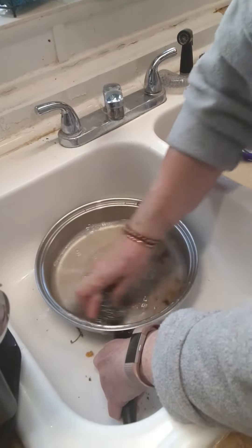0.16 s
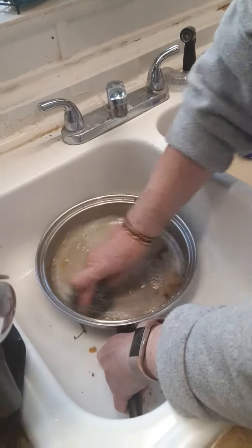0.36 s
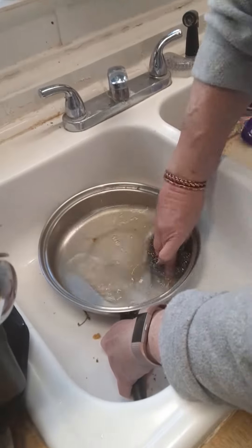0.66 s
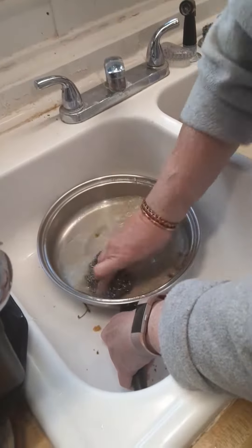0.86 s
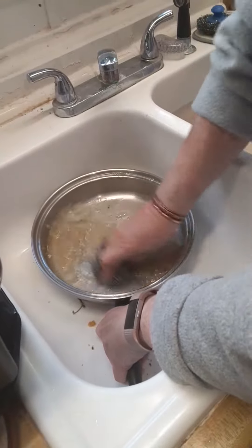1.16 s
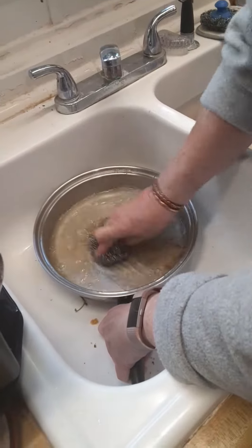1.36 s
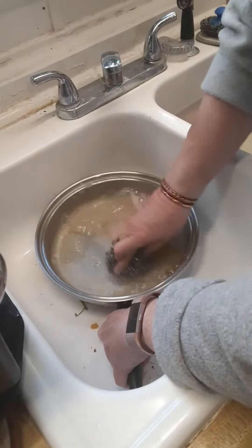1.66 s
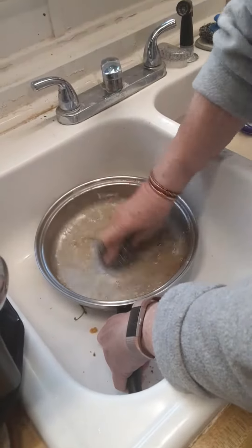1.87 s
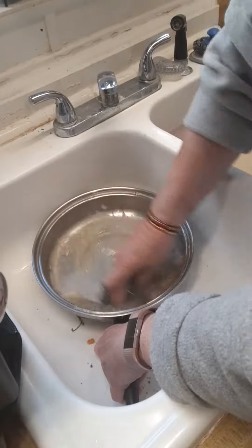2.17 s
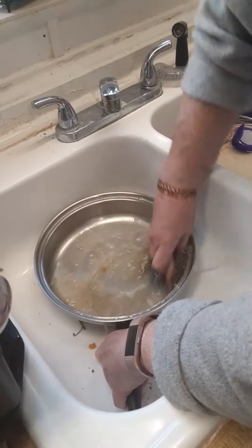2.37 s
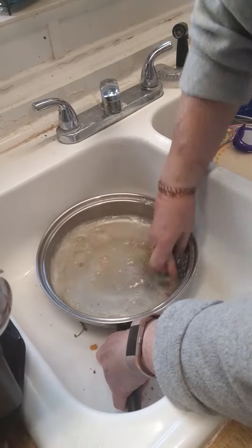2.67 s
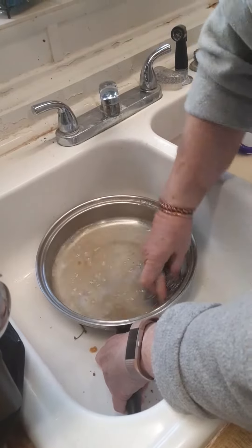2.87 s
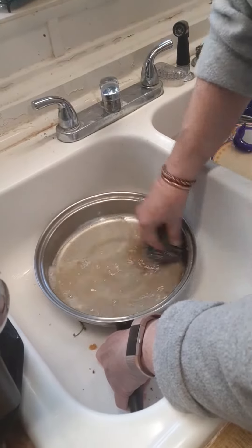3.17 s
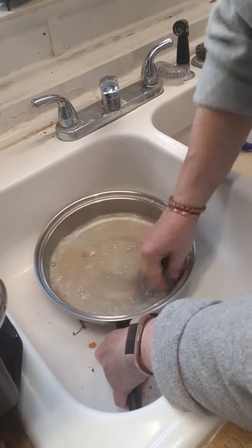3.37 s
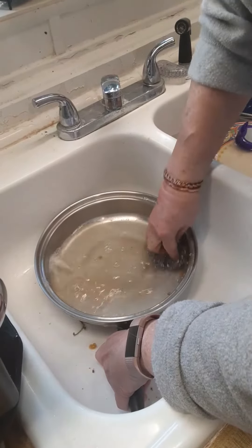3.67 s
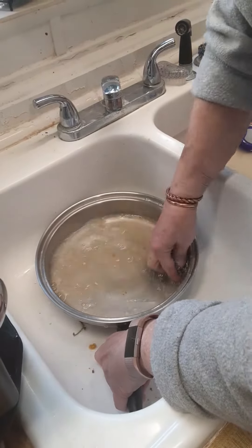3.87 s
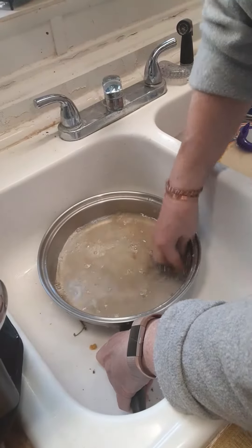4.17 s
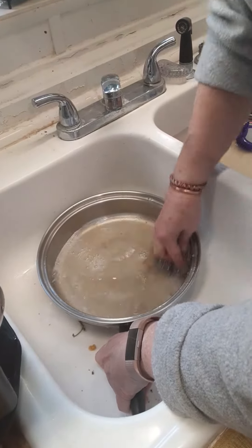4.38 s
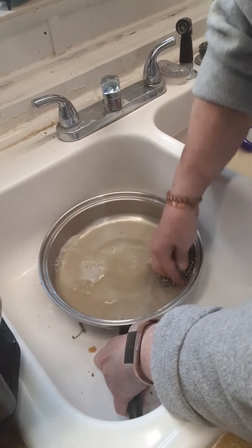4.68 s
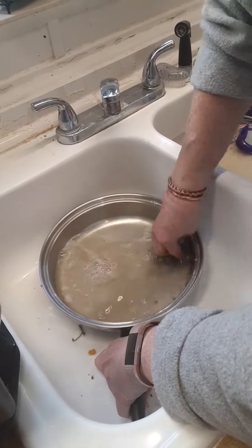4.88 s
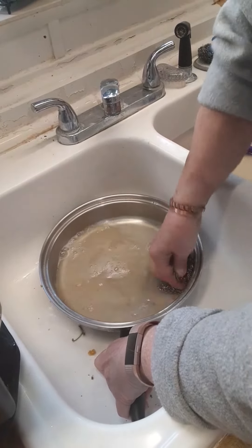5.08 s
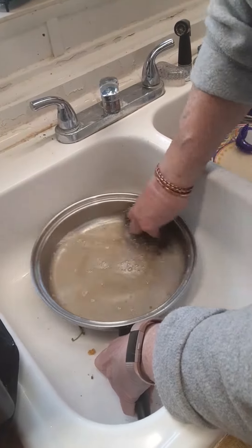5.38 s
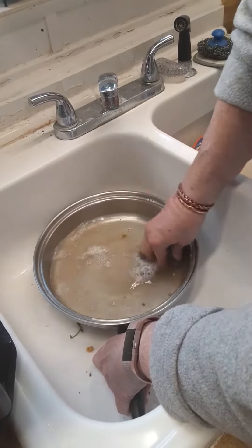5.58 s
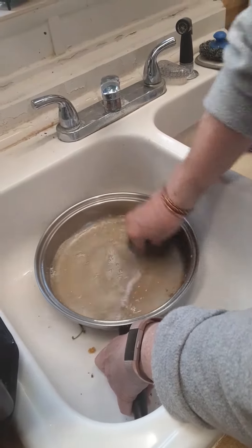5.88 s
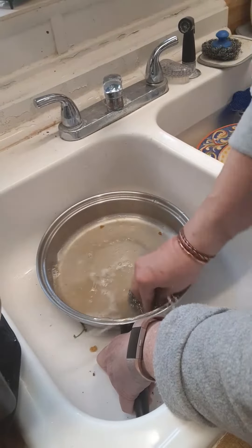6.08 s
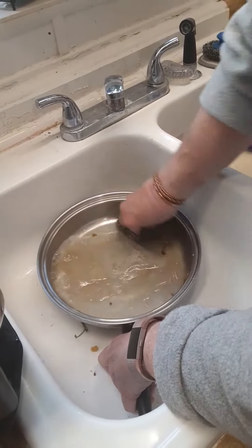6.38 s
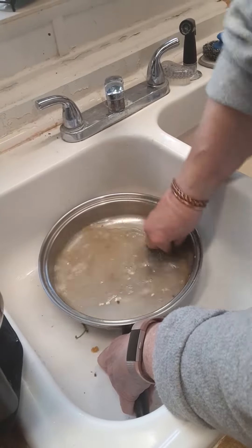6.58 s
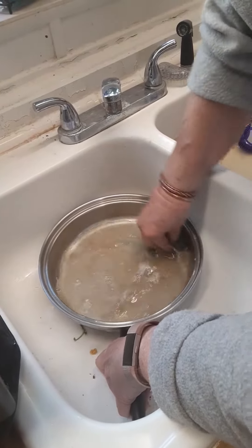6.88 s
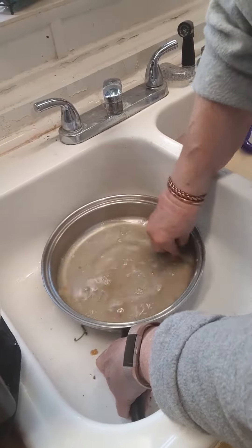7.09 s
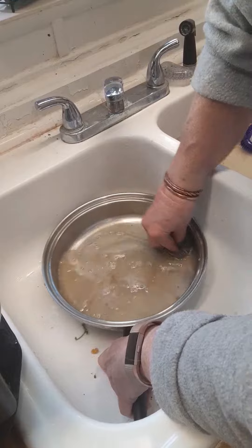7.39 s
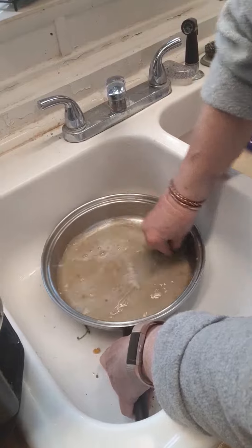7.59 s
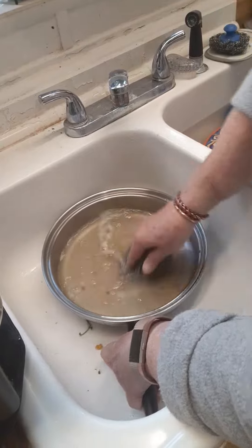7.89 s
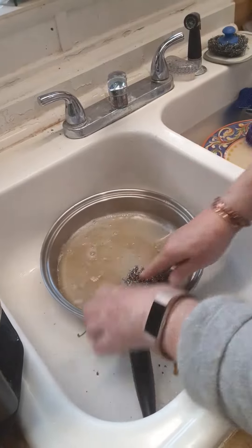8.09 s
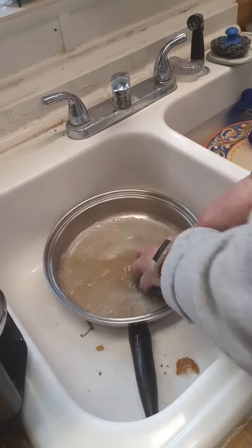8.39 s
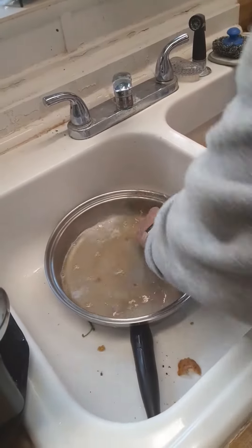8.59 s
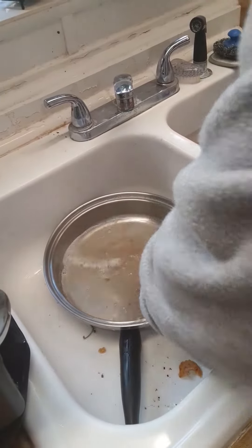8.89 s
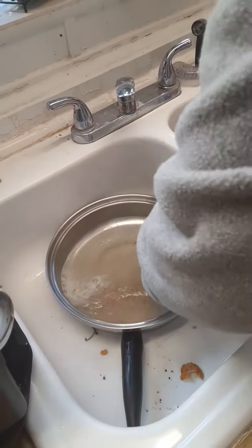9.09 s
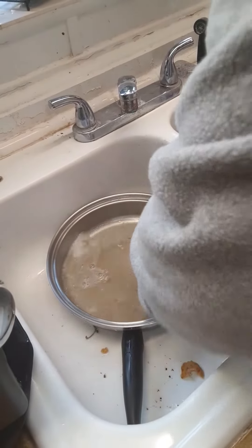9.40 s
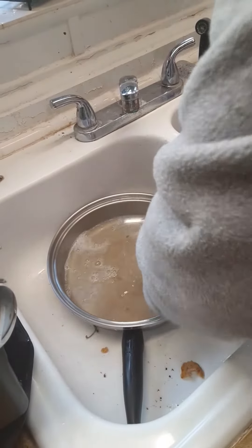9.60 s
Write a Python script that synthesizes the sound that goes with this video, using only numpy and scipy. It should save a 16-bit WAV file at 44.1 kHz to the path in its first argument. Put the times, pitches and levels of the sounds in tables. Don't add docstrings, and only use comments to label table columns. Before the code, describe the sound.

Gritty wet scrubbing strokes hiss over a metal pan while water sloshes, bubbles pop and the pan clanks hard on the basin.

```python
import sys
import numpy as np
from scipy import signal
from scipy.fft import rfft, irfft, next_fast_len
from scipy.io import wavfile
from scipy.ndimage import uniform_filter1d, map_coordinates

SR = 44100
rng = np.random.default_rng(int(sys.argv[2]) if len(sys.argv) > 2 else 0)


def wav_out(sig):
    wavfile.write(sys.argv[1], SR, np.round(np.clip(np.atleast_2d(sig).T, -1, 1) * 32767).astype(np.int16))


def convert_level_to_amplitude(level_db):
    exponent = np.asarray(level_db, float) / 20
    return 10 ** exponent


N = 429093


def unit(x):
    return x / np.sqrt(np.mean(x ** 2) + 1e-20)


def along(points, hz):
    f, v = np.transpose(points)
    return np.interp(np.log(hz + 1), np.log(f + 1), v)


def wobble(rate_hz):
    knots = rng.standard_normal(int(N * rate_hz / SR) + 4)
    return map_coordinates(knots, [np.arange(N) * rate_hz / SR])


def filtered(x, response):
    m = next_fast_len(N + SR // 2)
    return irfft(rfft(x, m) * response(np.fft.rfftfreq(m, 1 / SR)), m)[..., :N]


def resonances(modes):
    def response(f):
        total = 0
        for k, (hz, width, db) in enumerate(modes):
            total = total + (-1) ** k * convert_level_to_amplitude(db) * 1j * f * width / (hz * hz - f * f + 1j * f * width)
        return total
    return response


def ports(f):
    lag = np.array([[0], [7]]) / SR
    return convert_level_to_amplitude([[.75], [-.75]]) * np.exp(-2j * np.pi * f * lag)


# pitch_hz, density_db (per Hz)
QUIET_AIR = [(30, -3.5), (187, -11.5), (468, -7.5), (760, -8.5), (1000, -27.5), (3000, -22), (5000, -22.5),
             (15600, -29.5)]


def kitchen():
    air = unit(filtered(rng.standard_normal((2, N)), lambda f: convert_level_to_amplitude(along(QUIET_AIR, f))))
    hum_hz, hum_db = 737, -67
    hum_level = convert_level_to_amplitude(hum_db + 2.2 * wobble(5.2))
    hum = hum_level * np.sin(2 * np.pi * hum_hz * np.arange(N) / SR + .6 * wobble(7.8))
    return convert_level_to_amplitude(-62.5) * air + hum


# pitch_hz, t60_s
ECHO_DECAY = [(100, 0.27), (500, 0.2), (2000, 0.068), (8000, 0.014), (16000, 0.053)]
# pitch_hz, level_db
ECHO_LEVEL = [(100, -32), (250, -36.5), (500, -10.5), (1000, -9), (2000, 3), (6000, 3.5), (15000, 4.5)]


def echoes(x, count=3):
    hz, t, z = signal.stft(rng.standard_normal((count, 2, SR // 5)), SR, nperseg=256)
    z = z * convert_level_to_amplitude(-60 * t / along(ECHO_DECAY, hz)[:, None])
    strength = np.sqrt(np.mean(np.sum(np.abs(z) ** 2, axis=3), axis=(0, 1)))
    z = z / strength[:, None] * convert_level_to_amplitude(along(ECHO_LEVEL, hz))[:, None]
    tail = signal.istft(z, SR, nperseg=256)[1] / 148
    turn = (np.arange(N) // 4000) % count
    lanes = x * (turn == np.arange(count)[:, None])
    return signal.oaconvolve(np.float32(lanes[:, None]), np.float32(tail), axes=2).sum(axis=0)[:, :N]


# start_s, peak_db
LEANS = [(0.18, -39), (1.61, -49), (2.2, -56.5), (3.02, -50), (3.8, -47), (4.14, -45), (4.5, -50),
         (4.75, -57), (5.27, -39), (5.65, -41), (5.95, -49.5), (6.87, -43.5), (7.45, -40), (7.63, -55),
         (8.73, -49)]


def leans():
    out, t = np.zeros(N + SR), np.arange(SR // 4) / SR
    counter_hz, sink_hz, t60_s, rise_s = 58, 90, 0.2, 0.02
    sway = np.sin(2 * np.pi * counter_hz * t) + 0.8 * np.sin(2 * np.pi * sink_hz * t)
    thump = convert_level_to_amplitude(-60 * t / t60_s) * (1 - np.exp(-t / rise_s)) * sway
    for s, db in LEANS:
        out[round(s * SR):][:len(t)] += convert_level_to_amplitude(db + 9) * thump
    return out[:N]


# start_s, peak_db, clang_db, boom_db, favoured_pitch_hz
BANGS = [(0.175, -6, -13, -14.5, 341), (0.204, -15, -22, -11, 432), (2.397, -16, -27, -10, 264),
         (3.001, -23, -34, -10, 280), (3.05, -42.5, -35, 6, 215), (3.588, -20.5, -19, -34, 283),
         (3.609, -23, 2, -8, 529), (3.76, -20, -28.5, -14, 340), (4.112, -18.5, -16, -18.5, 326),
         (5.164, -20, -15.5, -28, 572), (5.258, -0.5, -17.5, -14.5, 346), (5.394, -0.5, 1, -21.5, 608),
         (5.631, -17, -26, -23.5, 280), (5.658, -20.5, -18.5, -2, 240), (5.678, -27.5, -37, 3, 249),
         (3.509, -36, -35, 3, 215), (3.912, -40.5, -38, 4.5, 215), (4.502, -35.5, -31, -3, 283),
         (4.431, -40, -34, -0.5, 215), (5.79, -9, -12.5, -33, 1056), (6.212, -14, -22, -11, 283),
         (6.758, -21.5, -23, -15.5, 308), (6.862, -2.5, -17, -18, 305), (6.993, -8, -18.5, -17.5, 380),
         (7.105, -1.5, -20, -10.5, 302), (7.207, -1.5, -9.5, -24.5, 668), (7.362, -2.5, -21.5, -17, 309),
         (7.442, -9.5, -5, -19, 603), (1.603, -30.5, -46, -10.5, 250), (8.723, -29.5, -34, -7.5, 300),
         (5.285, -10, -17.5, -13, 520), (6.874, -16.5, -10, -28.5, 660), (7.135, -12.5, -24.5, -13.5, 330),
         (8.73, -26, -25, -9.5, 240)]
# start_s, peak_db, favoured_pitch_hz
TAPS = [(0.4, -32.5, 330), (0.507, -33, 1120), (0.75, -36, 630), (0.777, -36, 1080), (1.25, -39, 1060),
        (8.452, -28.5, 603), (2.112, -34, 1060), (2.262, -33.5, 283), (3.108, -30.5, 600),
        (3.962, -29.5, 567), (4.311, -32.5, 600), (4.414, -33.5, 324), (4.53, -36, 950),
        (4.693, -29.5, 590), (5.925, -29.5, 480), (6.434, -32.5, 525), (6.57, -37, 292),
        (6.667, -35.5, 290.6), (7.628, -33.5, 283), (8.255, -41, 280), (8.509, -28.5, 600),
        (8.582, -33, 675), (9.1, -35, 910), (9.52, -30, 253), (1.743, -37, 727), (1.787, -38, 1060),
        (2.631, -36, 217), (6.405, -45, 250), (6.839, -34, 310), (7.645, -40, 283), (7.903, -40.5, 780),
        (9.325, -34, 230), (9.495, -40, 1050), (9.703, -35.5, 212), (0.038, -47, 283)]
# pitch_hz, clang_db, edge_db, boom_db
TAP_COLOUR = [
    (280, -51.5, -17.5, -9),
    (600, -4, -10.5, -24.5),
    (1080, 0, -4.5, -17),
]


def blows():
    hz, *colour = np.transpose(TAP_COLOUR)
    taps = [(s, db, *[np.interp(f, hz, c) for c in colour], f) for s, db, f in TAPS]
    bang_edge_db = -25
    bangs = [(s, db, clang, bang_edge_db, boom, f) for s, db, clang, boom, f in BANGS]
    return sorted(taps + bangs)


def after_blows(under_db, rise_s, t60_s):
    t, power = np.arange(SR // 4) / SR, np.zeros(N + SR)
    for s, blow_db, *_ in blows():
        jump = convert_level_to_amplitude(blow_db + under_db - 60 * t / t60_s) * np.minimum(t / rise_s, 1)
        power[round(s * SR):][:len(t)] += jump ** 2
    return np.sqrt(power[:N])


BOOM_HZ, BOOM_SWELL_S = 179.7, 0.035


def thuds():
    out, t = np.zeros(N + SR), np.arange(SR // 3) / SR
    delay_s, width_s, push_db = 0.0047, 0.00042, -3.4
    linger_db, linger_t60_s = -16, 0.66
    push = (t - delay_s) / width_s
    pulse = (push ** 2 - 1) * np.exp(-push ** 2 / 2)
    drum = np.minimum(t / BOOM_SWELL_S, 1) * np.sin(2 * np.pi * BOOM_HZ * t)
    for s, db, clang_db, _, boom_db, _ in blows():
        thud = convert_level_to_amplitude(push_db - .5 * max(clang_db + 30.5, 0)) * pulse
        ring = convert_level_to_amplitude(boom_db + 5.5 + linger_db - 60 * t / linger_t60_s) * drum
        out[round(s * SR):][:len(t)] += convert_level_to_amplitude(db) * (thud + ring)
    return filtered(out[:N], lambda f: (1j * f / (110 + 1j * f)) ** 2)


# pitch_hz, level_db, t60_s
PAN = [(108, -26, 0.5), (209, -2.5, 0.056), (283, 0, 0.087), (332.6, -4.5, 0.058), (432, -3, 0.077),
       (525, -2, 0.096), (588.4, -1, 0.075), (626.8, -3, 0.17), (678, -8.5, 0.11), (874.5, -5.5, 0.071),
       (957, -8, 0.08), (1056, -0.5, 0.076), (1124, -10, 0.044), (1361, -9, 0.1), (1531, -17, 0.09),
       (1530, -5.5, 0.031), (1920, -12, 0.047), (2110, -13.5, 0.043), (2740, -13.5, 0.057)]
# pitch_hz, level_db, t60_s
CLANK = [(150, -19.5, 0.48), (470, -8.5, 0.25), (1060, -4.5, 0.061), (2310, 3.5, 0.0052),
         (6300, -14, 0.025)]


def pan_ring(t, light, clang_db, edge_db, favoured_hz):
    f, clank_db, clank_t60 = np.transpose(CLANK)
    crowd = 200 * 28 ** ((np.arange(48) + rng.random(48)) / 48)
    crowd_modes = [crowd, np.interp(crowd, f, clank_db) - 3.5, np.interp(crowd, f, clank_t60)]
    hz, level, t60 = np.hstack([np.transpose(PAN), crowd_modes])[:, :, None]
    tilt = np.interp(np.log(hz), np.log([450, 1000, 2600]), [0, clang_db + 12.5, edge_db + 19.5])
    spot = (10 + 7 * light) * np.exp(-(np.log(hz / favoured_hz) / 0.07) ** 2)
    size = convert_level_to_amplitude(level + tilt + spot + rng.normal(0, 1.5, hz.shape))
    onset = 0.000943 + 0.00308 * rng.random(hz.shape) * (400 / hz) ** 0.285
    size, onset, turn, loss = np.float32([size, onset, 2 * np.pi * hz, np.log(1000) / t60])
    age = np.maximum(t - onset, 0)
    return (size * np.exp(-loss * age) * np.sin(turn * age)).sum(axis=0)


def crack(t, edge_db):
    grit = np.convolve(rng.standard_normal(len(t)), np.hanning(6), "same")
    return convert_level_to_amplitude(min(edge_db, -14) + 11.5 - 60 * t / 0.0065) * np.minimum(t / 0.00067, 1) * grit


def basin_boom(t, boom_db, flutter):
    swell = t / BOOM_SWELL_S
    shape = swell * np.exp(-swell ** 2.27 / 2) * (1 + 0.2 * flutter)
    return convert_level_to_amplitude(boom_db + 5.0) * shape * np.sin(2 * np.pi * BOOM_HZ * (1 + 0.02 * flutter[0]) * t)


def knocks():
    out, full = np.zeros(N + SR), np.arange(SR // 7, dtype=np.float32) / SR
    flutter_depth, flutter_grain_s, ring_share, quick_loss_s = 0.2, 0.004, 0.45, 0.018
    landing_s = 0.0047
    for s, db, clang_db, edge_db, boom_db, favoured_hz in blows():
        light = db < -26
        t = full[:SR // 11] if light else full
        ring = pan_ring(t, light, clang_db, edge_db, favoured_hz)
        flutter = np.interp(t, np.arange(40) * flutter_grain_s, rng.standard_normal(40))
        ring = ring * (1 + flutter_depth * flutter * np.minimum(t / .01, 1))
        ring = ring * (ring_share + (1 - ring_share) * np.exp(-t / quick_loss_s))
        blow = ring / np.abs(ring).max() + crack(t, edge_db) + basin_boom(t, boom_db, flutter)
        fade = np.minimum(1, (t[-1] - t) / 0.042) * np.minimum(1, t / landing_s)
        out[round(s * SR):][:len(t)] += convert_level_to_amplitude(db + 2.5) * fade * blow
    return filtered(out[:N], lambda f: (1j * f / (125 + 1j * f)) ** 3)


def bubble(hz, cycles, rise, t):
    age = t * hz / cycles
    return np.sin(2 * np.pi * hz * t * (1 + rise * age / 2)) * np.exp(-age) * (1 - np.exp(-t * hz / 0.66))


# start_s, peak_db, pitch_hz, spray_db
POPS = [(0.0597, -33.5, 1970, 7.5), (0.3397, -28, 2310, 10), (0.506, -28.5, 1890, -22.5),
        (0.6177, -36, 1920, -9), (0.7413, -29.5, 3060, 9.5), (0.8014, -27, 2010, -4.5),
        (1.087, -23, 1920, -4.5), (1.1325, -22.5, 1770, 7), (1.4825, -28, 2000, -22),
        (1.5191, -29, 2110, 10), (1.84, -27.5, 1530, -12.5), (1.872, -29.5, 2060, 7.5),
        (1.8984, -27.5, 3560, 4), (1.9779, -33, 2740, 7), (2.0113, -28.5, 1310, -7),
        (2.103, -18.5, 4770, 2.5), (2.124, -25, 2250, 3.5), (2.1378, -26, 1750, -15),
        (2.278, -22, 4760, -5.5), (2.3183, -13.5, 2910, -1), (2.3267, -15, 4400, -6.5),
        (1.131, -28, 1250, -10), (1.497, -36.5, 1230, -9), (1.958, -39, 1220, -10), (2.186, -31, 2150, -7),
        (3.379, -41, 4630, 17.5), (3.39, -24.5, 2060, -4.5), (3.502, -26, 1820, 7),
             (4.3488, -32, 2120, 3.5), (5.1198, -17.5, 4500, -14.5), (5.303, -20, 2050, -32),
             (5.3381, -28, 2110, -23.5), (5.7704, -26, 2010, -5), (5.978, -30, 3600, 1),
             (6.5756, -34, 1590, -4), (7.8424, -34, 3130, 9.5), (7.9108, -30.5, 4650, 10.5),
             (7.949, -40.5, 1494, -6), (8.09, -57.5, 2020, 19), (8.1347, -51.5, 2950, 13),
             (8.4509, -26.5, 2530, 2.5), (8.5133, -27.5, 1920, -28.5)]


def pops():
    out, t = np.zeros(N + SR), np.arange(SR // 14) / SR
    for s, db, hz, spray_db in POPS:
        pitch, late = rng.standard_normal((7, 1)), rng.random((7, 1))
        small_hz = hz * np.exp(0.28 + .45 * pitch)
        small = bubble(small_hz, 1.1, 0.056, np.maximum(t - 0.0098 * late, 0)).sum(axis=0)
        spray = convert_level_to_amplitude(-60 * t / 0.0048) * rng.standard_normal(len(t))
        splash = convert_level_to_amplitude(spray_db - 13.0) * (small + convert_level_to_amplitude(1.5) * spray)
        out[round(s * SR):][:len(t)] += convert_level_to_amplitude(db + 2.5) * (bubble(hz, 3.7, 0.009, t) + splash)
    return out[:N]


# start_s, peak_db, t60_s
SKIDS = [
    (0.742, -32.5, 0.03),
    (1.131, -31.5, 0.03),
    (1.519, -31.5, 0.03),
    (2.1, -29.5, 0.05),
    (2.317, -10.5, 0.022),
    (2.325, -24.5, 0.035),
    (7.646, -32, 0.03),
    (7.907, -35.5, 0.04),
    (8.451, -23, 0.025),
    (8.51, -35.5, 0.02),
]


def skids():
    out, t = np.zeros(N + SR), np.arange(SR // 14) / SR
    band = signal.butter(2, (1600, 5500), "band", fs=SR)
    rise_s = 0.0015
    for s, db, t60 in SKIDS:
        grit = signal.lfilter(*band, rng.standard_normal(len(t)))
        out[round(s * SR):][:len(t)] += convert_level_to_amplitude(db - 2 - 60 * t / t60) * np.minimum(t / rise_s, 1) * grit
    return out[:N]


# start_s, peak_db, pitch_hz
SNAGS = [(0.3283, -27.5, 14100), (0.8777, -21.5, 15000), (0.8976, -22.5, 12700), (1.1454, -16, 14500),
         (1.4989, -26.5, 15100), (1.5214, -21, 11800), (2.0208, -23, 12750), (2.1008, -18, 7840),
         (2.157, -31, 11300), (2.1715, -24, 14800), (2.215, -24.5, 12170), (2.3163, -27, 12300),
         (3.3767, -22.5, 12500), (4.155, -23, 9090), (5.5069, -16.5, 9930), (5.642, -29.5, 15100),
         (5.676, -17, 14400), (5.8571, -22, 14500), (6.406, -31.5, 11500), (7.648, -17, 14000),
         (8.4523, -24, 13500), (8.7266, -26.5, 7800), (8.9018, -18, 7770), (8.964, -16.5, 14900),
         (9.101, -15.5, 14000), (9.32, -27.5, 11700), (9.4923, -28, 15200)]


def snags():
    out, t = np.zeros(N + SR), np.arange(SR // 50) / SR
    t60_s, width_hz, broad_db = 0.006, 2500, -4
    for s, db, hz in SNAGS:
        a, b = rng.standard_normal((2, len(t)))
        tone = np.sin(2 * np.pi * hz * t)
        near = unit(np.convolve(a, np.exp(-np.pi * width_hz * t[:40]), "same")) * tone
        shape = convert_level_to_amplitude(db + 2.5 - 60 * t / t60_s) * np.minimum(t / .0004, 1)
        out[round(s * SR):][:len(t)] += shape * (tone + 0.37 * near + convert_level_to_amplitude(broad_db) * b)
    return filtered(out[:N], lambda f: (1j * f / (4000 + 1j * f)) ** 2)


# pitch_hz, level_db
SCATTER = [(100, -33), (200, -18.5), (500, -25.5), (2000, 15.5), (3300, 4), (5000, 15.5), (15000, 41.5)]


def scratches(colour, spread_db, patchy_db):
    sizes = convert_level_to_amplitude(spread_db * np.minimum(rng.exponential(size=N), 5.5))
    x = rng.standard_normal((3, N)) * sizes
    z = signal.stft(x.astype(np.float32), nperseg=256)[2]
    field = uniform_filter1d(uniform_filter1d(rng.standard_normal(z.shape[1:]), 6, 0), 8, 1)
    x = signal.istft(z * convert_level_to_amplitude(patchy_db * unit(field)).astype(np.float32), nperseg=256)[1]
    m = next_fast_len(N + SR // 2)
    f, spectrum = np.fft.rfftfreq(m, 1 / SR), rfft(x, m)
    stray = convert_level_to_amplitude(along(SCATTER, f))
    both = (spectrum[0] * ports(f) + spectrum[1:] * stray) / np.sqrt(1 + stray ** 2)
    return unit(irfft(both * colour(f), m)[:, :N])


def pan_drag():
    shell = [(55, 40, -17), (BOOM_HZ, 12, 7)]
    shell += [(hz, 1.2 / t60, db) for hz, db, t60 in PAN]
    return convert_level_to_amplitude(1.3 * wobble(22)) * scratches(resonances(shell), spread_db=1.16, patchy_db=3)


def froth(water):
    when, pitch, size = rng.random((3, 1500))
    t = np.arange(600) / SR
    loudness = convert_level_to_amplitude(-1.9 * np.log(size + 1e-3))[:, None]
    rings = bubble(900 * 3.5 ** pitch[:, None], 9.6, 0.17, t) * loudness
    where = (when * N).astype(int)[:, None] + np.arange(len(t))
    return convert_level_to_amplitude(-13.0) * water * unit(np.bincount(where.ravel(), rings.ravel(), N)[:N])


# pitch_hz, width_hz, level_db
SLOP = [(490, 1160, -5), (950, 1000, -13), (1700, 810, 5), (2060, 5000, 2.5), (4500, 2700, 1)]


def water_slop():
    return scratches(resonances(SLOP), spread_db=2.5, patchy_db=2.5)


# pitch_hz, density_db (per Hz)
WIRE = [(410, -45.5), (700, -7.5), (1060, -7), (1210, -27.5), (1410, -25.5), (1570, -3.5), (2060, 10.5),
        (2400, -4), (2860, 5.5), (3330, 4), (3800, 5.5), (4720, 5.5), (9900, 6.5), (12000, 8), (15600, 8)]


def wire_hiss():
    wires = scratches(lambda f: convert_level_to_amplitude(along(WIRE, f)), spread_db=3.1, patchy_db=2.6)
    at_wall = np.interp(np.arange(N) / SR, [2.7, 3.3, 5.1, 5.7], [0, 1, 1, 0])
    whistle, shadow = (12120, 220, -3), (3250, 900, -7)  # pitch_hz, width_hz, level_db
    return wires + at_wall * convert_level_to_amplitude(2 * wobble(6)) * filtered(wires, resonances([whistle, shadow]))


# fastest_s, hiss_db, rise_s, fall_s
SWIRLS = [(0.001, -42.5, 0.063, 0.14), (0.139, -48, 0.011, 0.059), (0.335, -43, 0.072, 0.055),
          (0.419, -44.5, 0.15, 0.035), (0.512, -39, 0.069, 0.04), (0.667, -43, 0.058, 0.19),
          (0.89, -48, 0.028, 0.016), (1.144, -41.5, 0.16, 0.022), (1.214, -43.5, 0.042, 0.095),
          (1.339, -45, 0.06, 0.043), (1.425, -41, 0.024, 0.054), (1.526, -39, 0.026, 0.055),
          (1.663, -43, 0.047, 0.057), (1.796, -45, 0.052, 0.026), (1.978, -44, 0.21, 0.17),
          (2.114, -41, 0.06, 0.11), (2.187, -51.5, 0.044, 0.06), (2.316, -37, 0.064, 0.074)]
# fastest_s, hiss_db, rise_s, fall_s
SCRUBS = [(2.5, -41.5, 0.049, 0.16), (2.653, -35.5, 0.056, 0.049), (2.888, -41.5, 0.15, 0.063),
          (3.093, -37.5, 0.034, 0.04), (3.192, -42, 0.08, 0.074), (3.305, -36, 0.052, 0.043),
          (3.493, -35.5, 0.1, 0.12), (3.715, -40.5, 0.072, 0.16), (3.905, -37.5, 0.032, 0.051),
          (4.154, -38.5, 0.098, 0.049), (4.287, -38, 0.041, 0.08), (4.445, -39.5, 0.044, 0.1),
          (4.57, -38.5, 0.015, 0.026), (4.673, -37.5, 0.055, 0.078), (4.863, -37, 0.055, 0.056),
          (4.979, -41, 0.034, 0.039), (5.13, -35, 0.057, 0.12), (5.403, -41, 0.037, 0.066),
          (5.515, -35, 0.038, 0.04), (5.709, -39, 0.078, 0.049), (5.868, -41.5, 0.059, 0.084),
          (5.941, -40.5, 0.012, 0.038)]
# fastest_s, hiss_db, rise_s, fall_s
DIGS = [(6.223, -42, 0.12, 0.11), (6.398, -49.5, 0.032, 0.024), (6.504, -40.5, 0.094, 0.021),
        (6.607, -40.5, 0.039, 0.035), (6.743, -39.5, 0.065, 0.039), (6.864, -38.5, 0.044, 0.023),
        (6.999, -35, 0.042, 0.026), (7.119, -38, 0.043, 0.033), (7.256, -40, 0.042, 0.029),
        (7.375, -38, 0.035, 0.029), (7.522, -42, 0.067, 0.032), (7.646, -47, 0.06, 0.079),
        (7.854, -48.5, 0.104, 0.087), (8.254, -47.5, 0.036, 0.158), (8.465, -51.5, 0.011, 0.063),
        (8.722, -43.5, 0.16, 0.032), (8.907, -41.5, 0.065, 0.036), (8.958, -41, 0.029, 0.065),
        (9.109, -39.5, 0.033, 0.061), (9.378, -36, 0.059, 0.024), (9.513, -36.5, 0.039, 0.04),
        (9.74, -42.5, 0.066, 0.05)]


def strokes():
    drop_db, roundness = 7, 1.6
    t = np.arange(0, N + 64, 64) / SR
    power = convert_level_to_amplitude(-75) ** 2
    for s, db, rise, fall in SWIRLS + SCRUBS + DIGS:
        away = np.abs((t - s) / np.where(t < s, rise, fall))
        power = power + convert_level_to_amplitude(db - drop_db * away ** roundness) ** 2
    return np.interp(np.arange(N) / SR, t, 10 * np.log10(power))


# time_s, pad_wetness_db, weight_on_pan_db (both over the mean hiss)
HAND = [(0, -6.5, -6.5), (1.2, -1.5, -15), (1.9, -5.5, -20), (2.3, -2, -4.5), (2.7, -10.5, -7.5),
        (3.3, -2.5, -10.5), (3.8, -8.5, -8), (4.4, -12, -11.5), (5.0, -15, -8.5), (5.7, -10.5, -4.5),
        (7.3, -2, -11.5), (7.75, -10, -10.5), (8.2, -3, -14), (8.5, 0.5, -2), (8.9, -5, -1.5),
        (9.73, -5, -5)]


def pad():
    s, *cols = np.transpose(HAND)
    wet_db, weight_db = [np.interp(np.arange(N) / SR, s, c) for c in cols]
    hiss_db = strokes() - 4
    mean_db = uniform_filter1d(hiss_db, int(0.93 * SR))
    swell_db = hiss_db - mean_db
    slosh = after_blows(-45.5, rise_s=0.0078, t60_s=0.32)
    water = np.hypot(convert_level_to_amplitude(mean_db + wet_db + 0.83 * swell_db), slosh)
    rattle = after_blows(-22.5, rise_s=0.0025, t60_s=0.29)
    weight = np.hypot(convert_level_to_amplitude(mean_db + weight_db + 0.81 * swell_db), rattle)
    catch = wobble(35)
    rub = convert_level_to_amplitude(hiss_db + 9.5 + 1.2 * catch) * wire_hiss()
    rub = rub + convert_level_to_amplitude(6.5 + 0.38 * catch) * water * water_slop()
    return rub + convert_level_to_amplitude(4.5) * weight * pan_drag(), froth(water)


def scene():
    rub, suds = pad()
    hits = suds + pops() + knocks() + thuds() + skids() + leans()
    ticks = snags()
    direct = filtered(hits + ticks, ports)
    return rub + direct + echoes(hits + convert_level_to_amplitude(-6) * ticks) + kitchen()


def low_pass(x):
    return signal.sosfilt(signal.butter(12, 16820, fs=SR, output="sos"), x)


# pitch_hz, level_db
PORT_TILT = [(200, 0), (600, 0.5), (1400, -0.5), (2800, -1.7), (5600, 2.1), (9500, 3), (13500, -0.5)]


def record(dry):
    def microphones(f):
        tilt = convert_level_to_amplitude(along(PORT_TILT, f) * [[.5], [-.5]])
        return (f < 15500) * 1j * f / (45 + 1j * f) * tilt
    mix = np.clip(filtered(dry, microphones), -.99, .99)
    return low_pass(mix)


dry = scene()
out = record(dry)
wav_out(out)
```